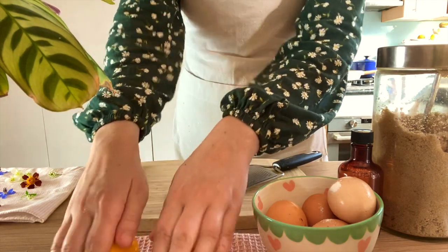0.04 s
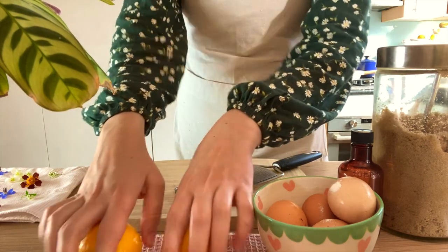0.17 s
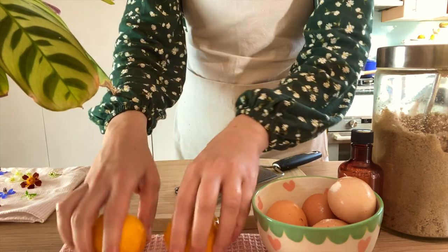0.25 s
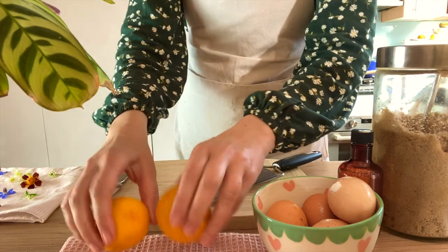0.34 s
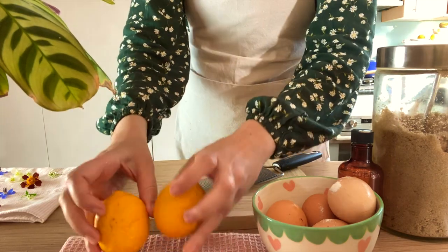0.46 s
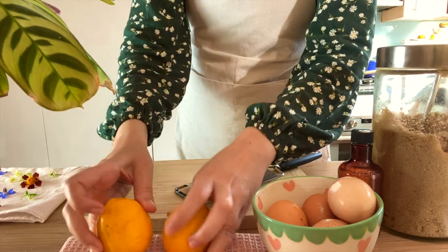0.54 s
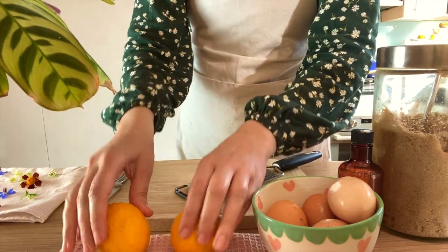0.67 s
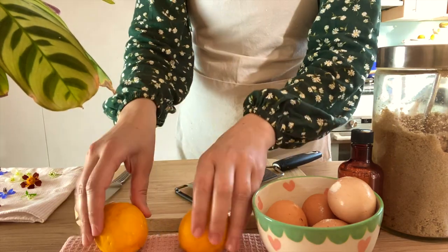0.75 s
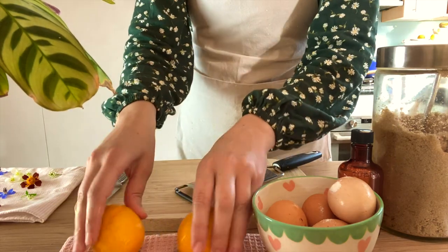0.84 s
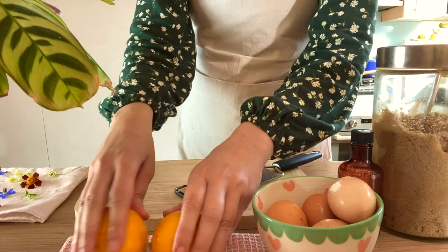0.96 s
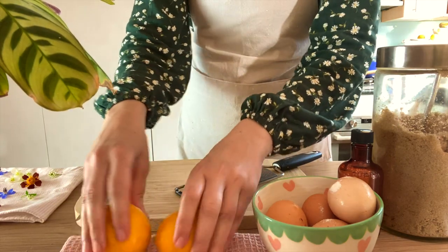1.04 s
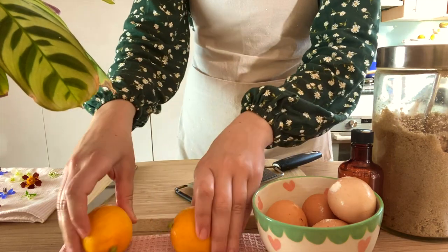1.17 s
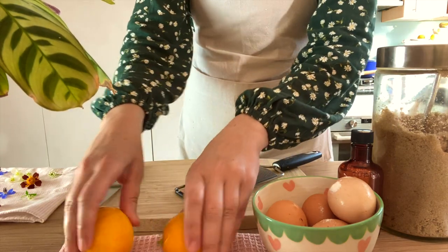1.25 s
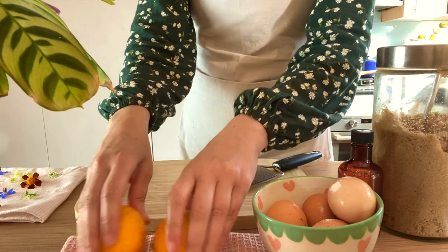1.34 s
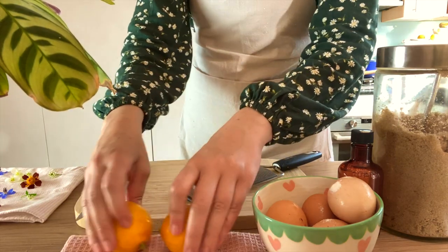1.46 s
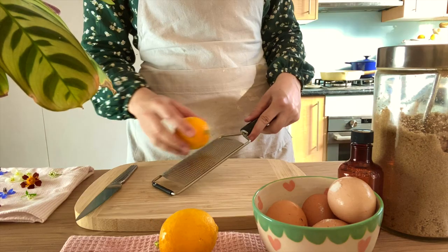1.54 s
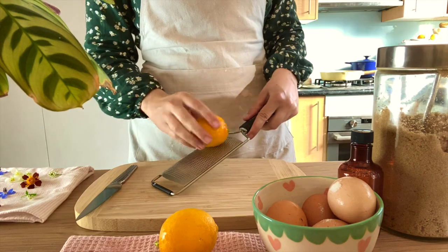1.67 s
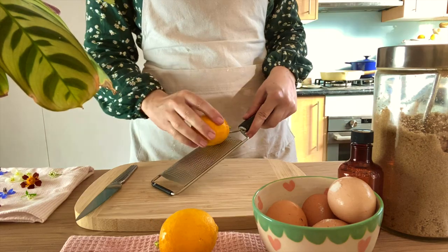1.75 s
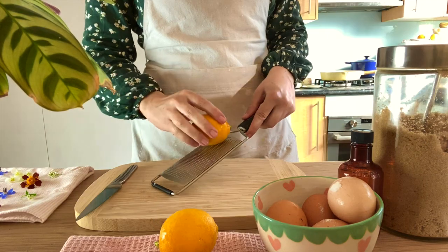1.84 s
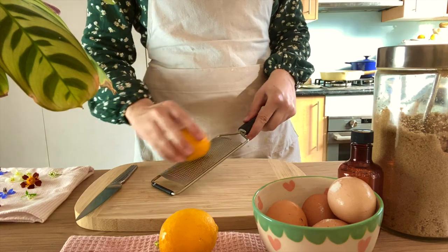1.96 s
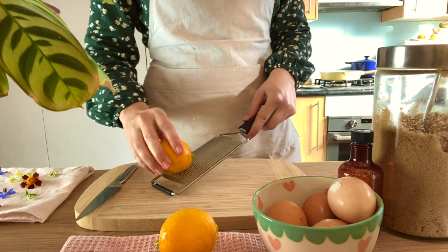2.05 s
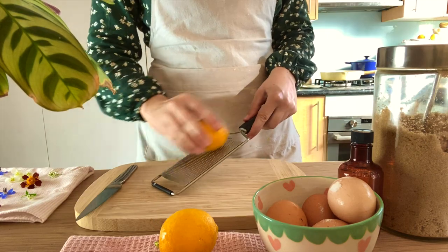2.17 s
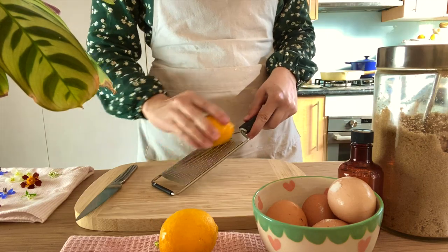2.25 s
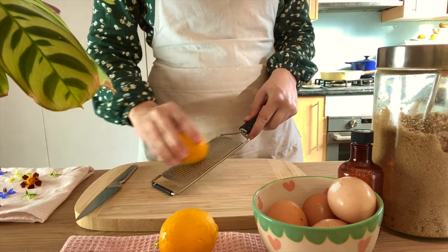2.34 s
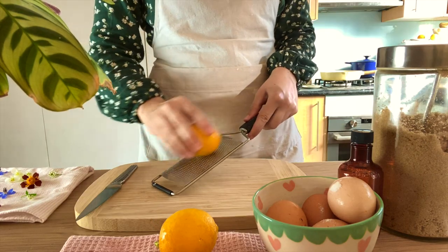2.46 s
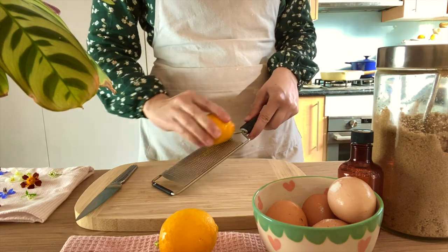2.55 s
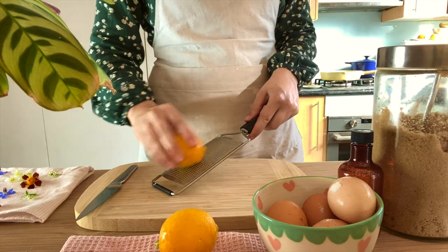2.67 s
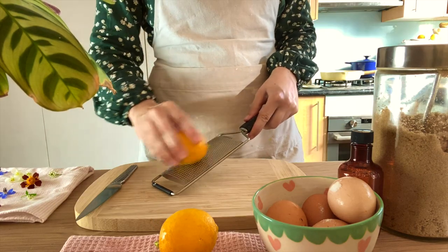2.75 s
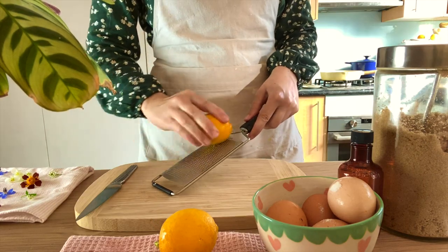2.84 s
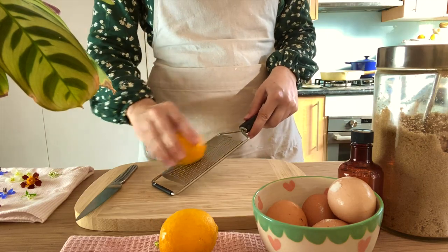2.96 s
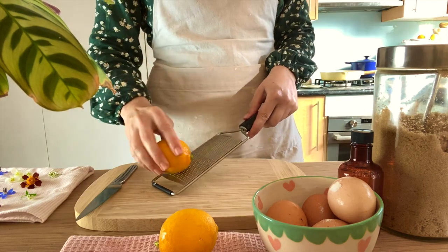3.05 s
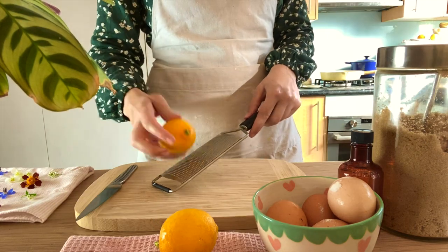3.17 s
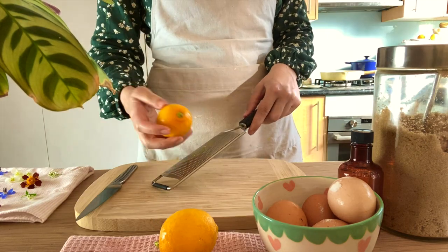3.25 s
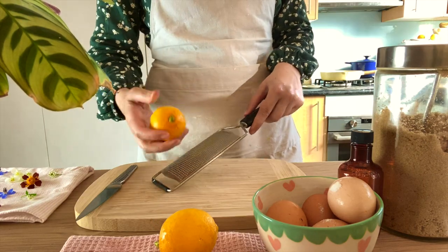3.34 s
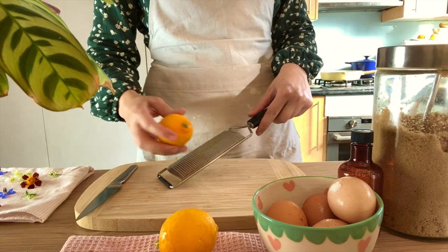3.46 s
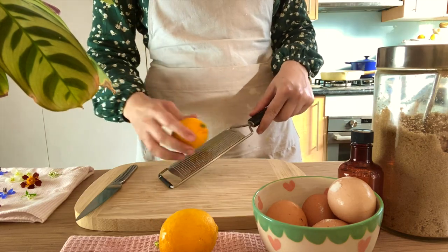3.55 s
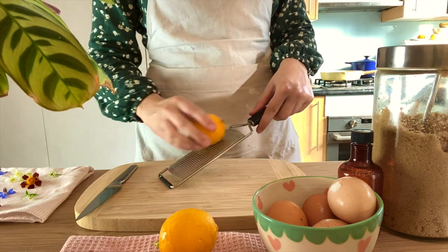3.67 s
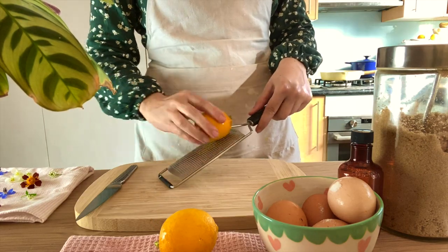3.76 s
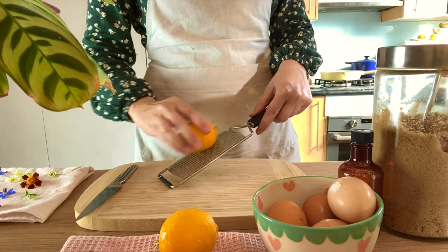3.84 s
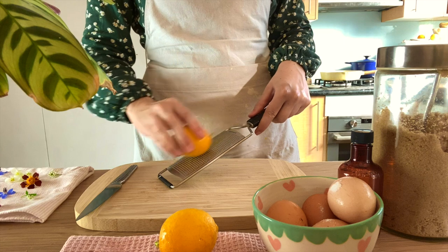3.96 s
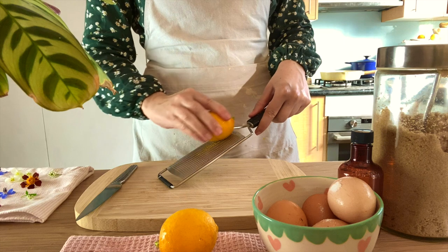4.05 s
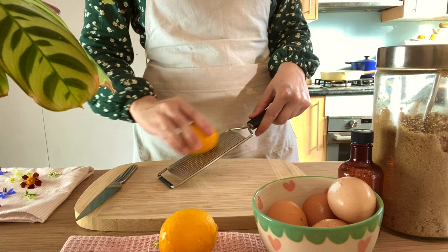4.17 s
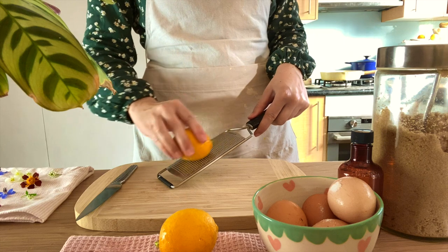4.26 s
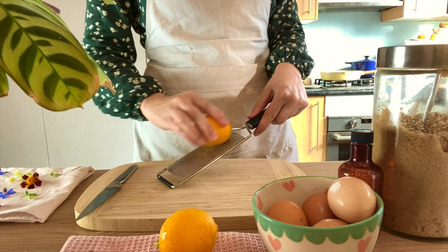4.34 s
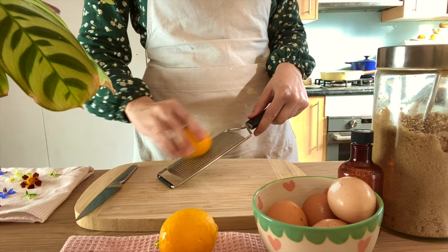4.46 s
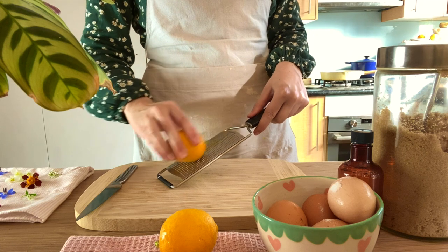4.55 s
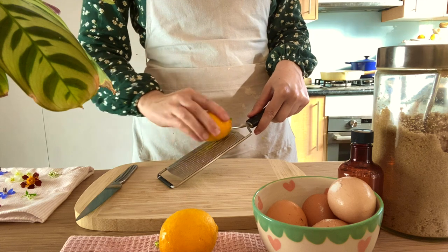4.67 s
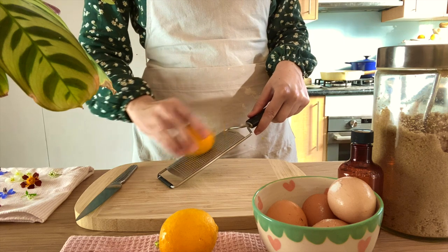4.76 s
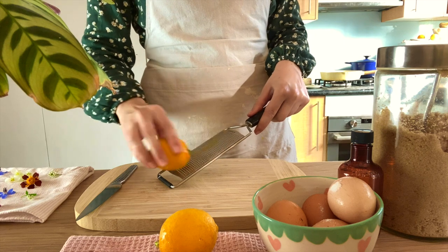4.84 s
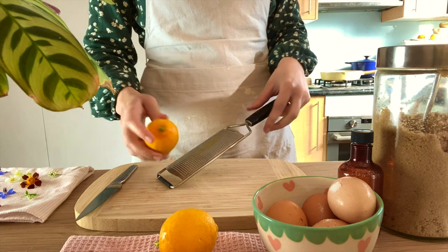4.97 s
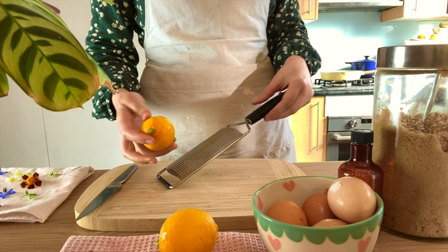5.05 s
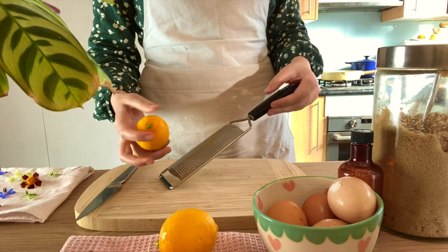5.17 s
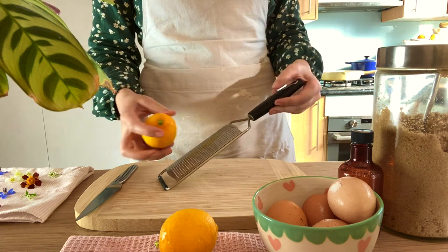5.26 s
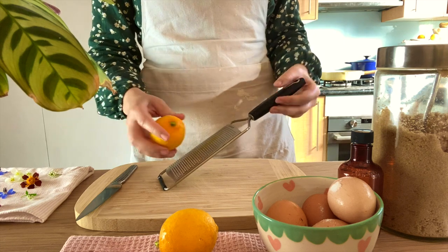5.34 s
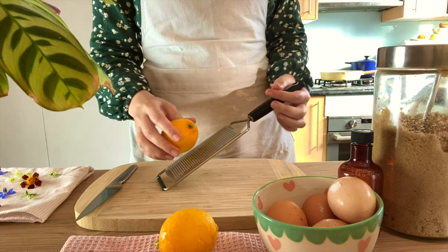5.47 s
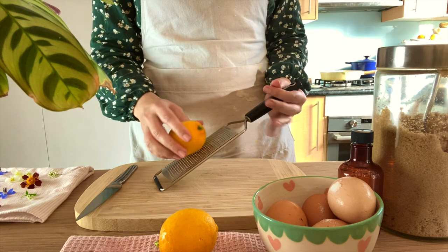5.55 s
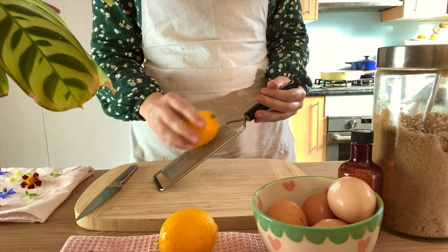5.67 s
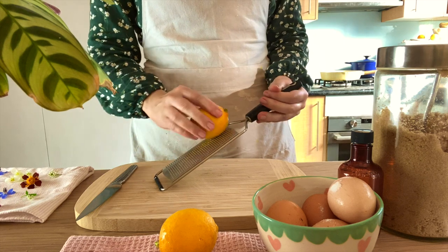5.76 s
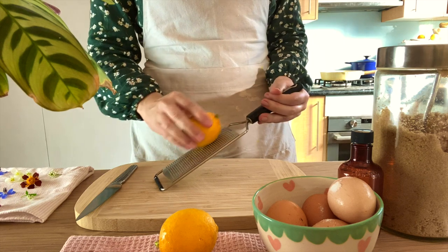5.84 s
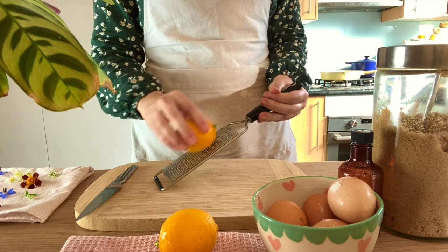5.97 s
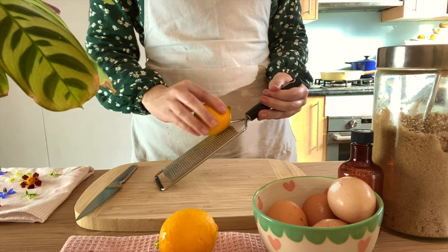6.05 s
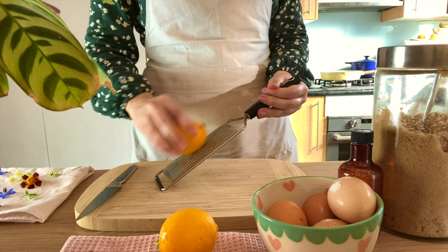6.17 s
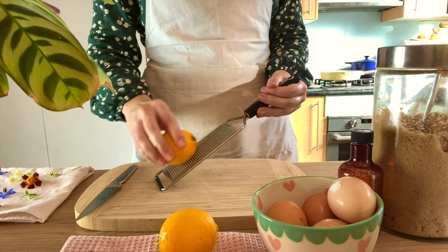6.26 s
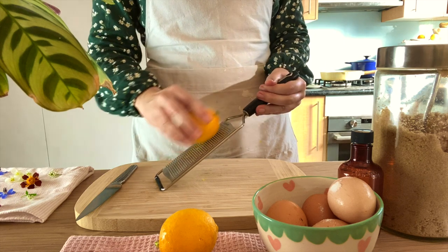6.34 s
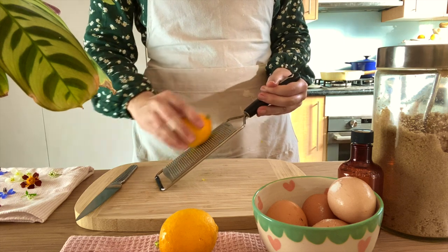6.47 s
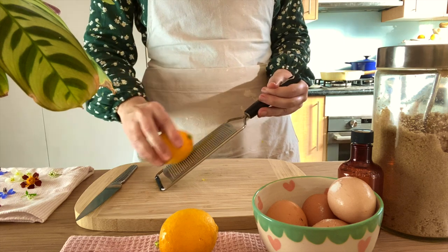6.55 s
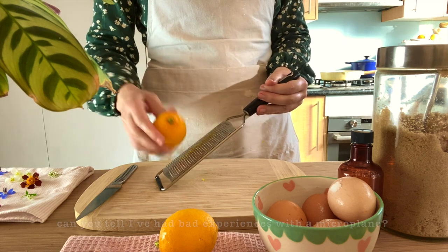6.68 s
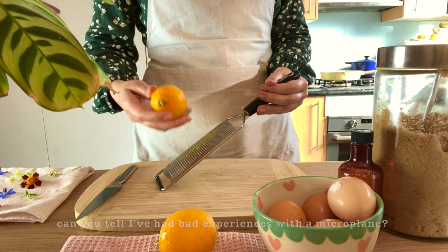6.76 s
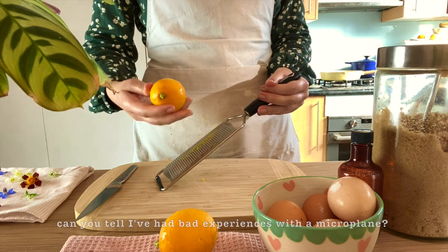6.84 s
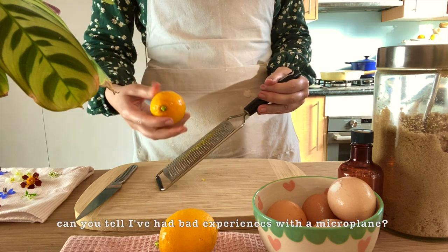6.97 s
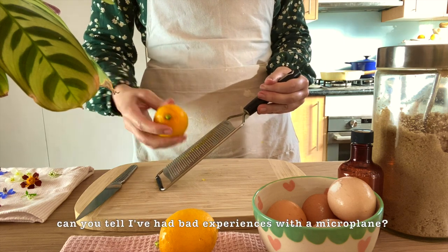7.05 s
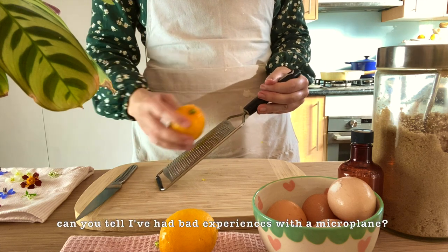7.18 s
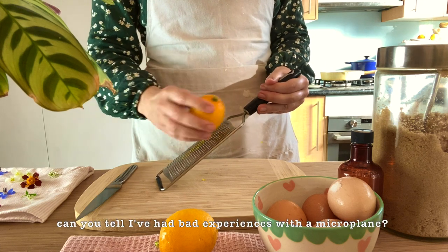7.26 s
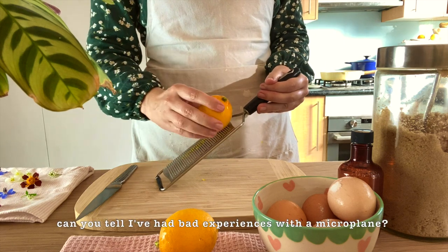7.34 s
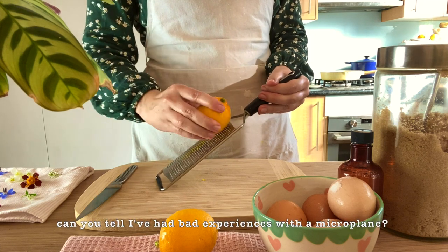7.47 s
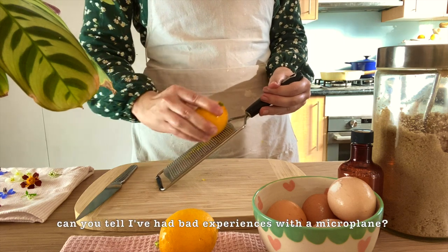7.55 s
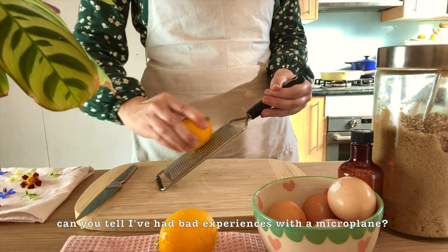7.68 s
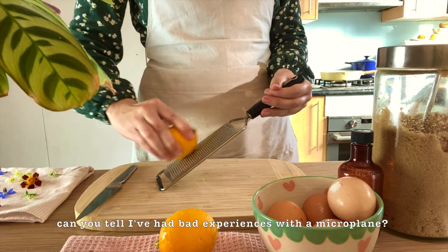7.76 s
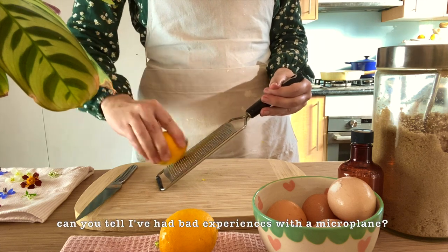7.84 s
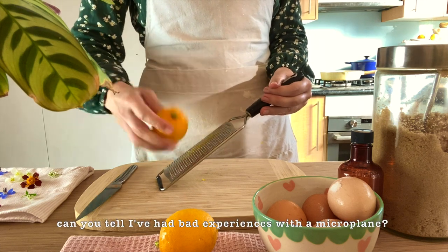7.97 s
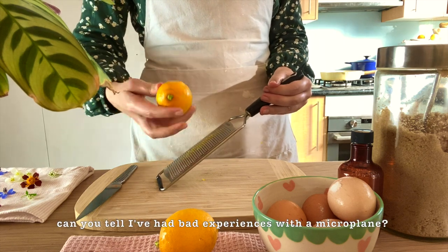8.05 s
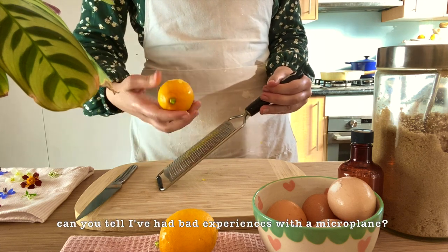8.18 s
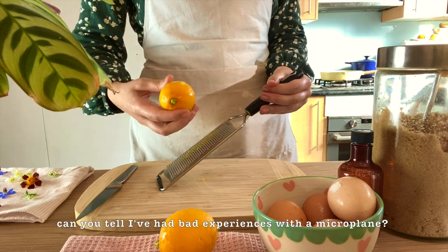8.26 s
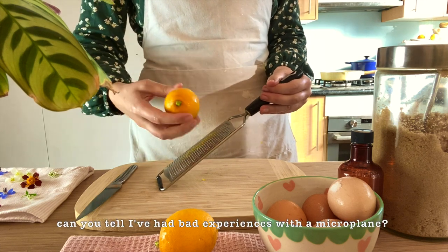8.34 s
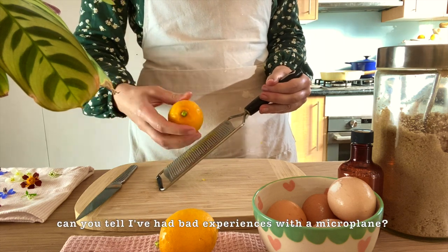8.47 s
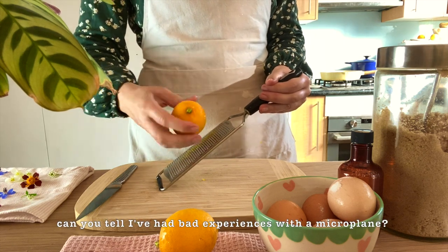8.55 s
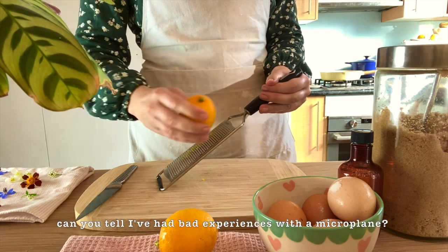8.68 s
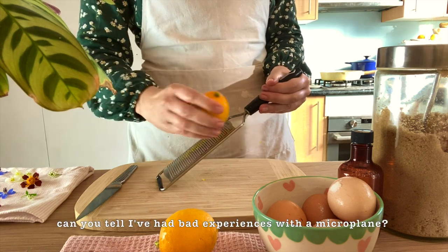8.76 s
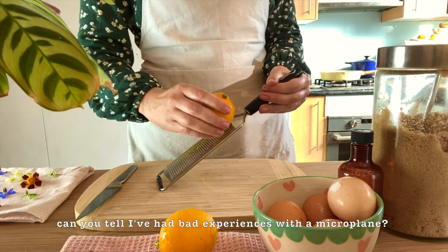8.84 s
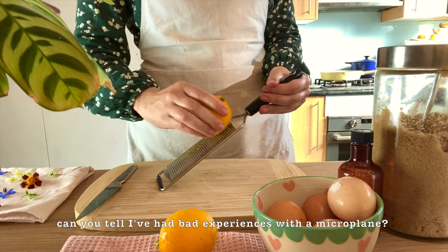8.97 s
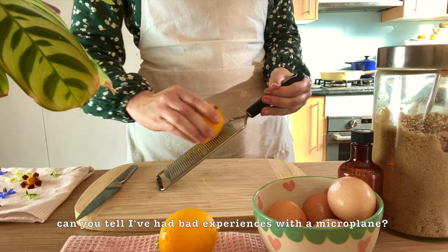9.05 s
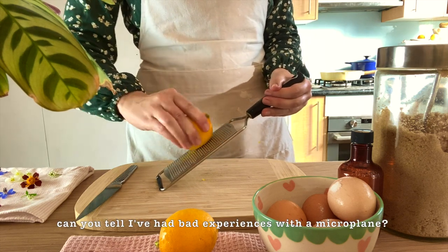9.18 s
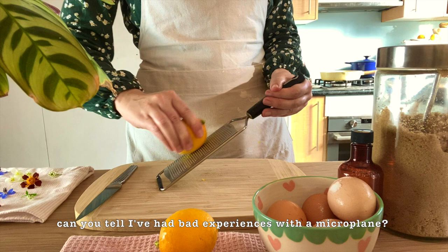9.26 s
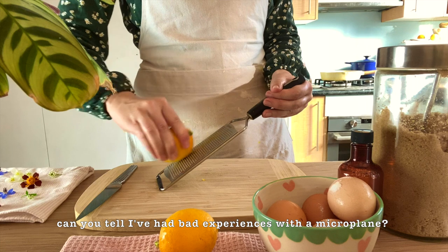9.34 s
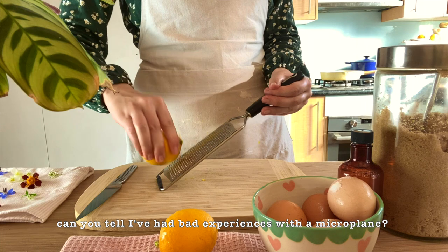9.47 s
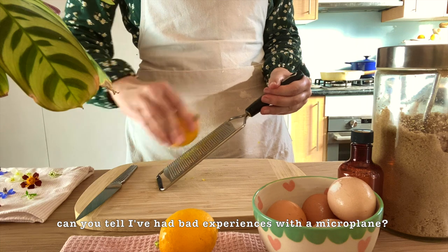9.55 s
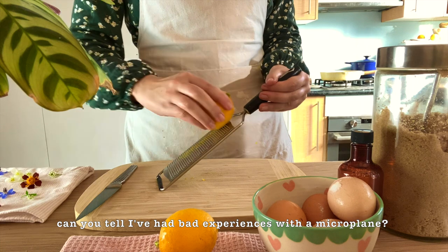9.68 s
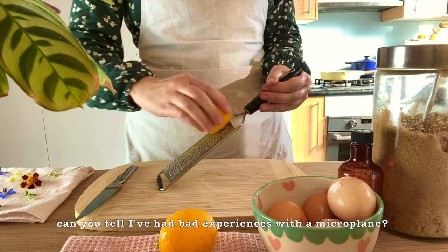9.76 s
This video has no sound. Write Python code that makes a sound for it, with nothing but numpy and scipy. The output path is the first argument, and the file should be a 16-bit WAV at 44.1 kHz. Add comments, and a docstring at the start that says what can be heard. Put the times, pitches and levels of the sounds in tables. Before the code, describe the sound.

Citrus zested on a long fine steel grater over a wooden board, three runs of quick raspy strokes, then slower juddering ones, in a small kitchen.

```python
"""A low hum and faint air in a small kitchen come first, then fingers rustle and a grater knocks on wood.
A lemon is zested on a long, fine steel grater whose tip rests on a wooden board: three runs of quick strokes,
bright going down and hollow coming back, then a few slow, juddering ones. Grains of noise for the teeth
tear the peel, ring the blade and drum the board. In between come more knocks, rubs and light touches.
The sound reaches two microphones directly and through a short room tail."""
import sys
import numpy as np
from scipy import signal
from scipy.fft import rfft, irfft, next_fast_len
from scipy.io import wavfile
from scipy.ndimage import map_coordinates

SR = 44100
rng = np.random.default_rng(int(sys.argv[2]) if len(sys.argv) > 2 else 0)


def to_wav(sig):
    """Store sig (one row per channel, or 1-D mono) as 16-bit WAV at the path in sys.argv[1].

    Samples outside -1..1 are clipped; the rate is SR.
    """
    pcm = np.clip(np.atleast_2d(sig), -1, 1) * 32767
    pcm = np.round(pcm).astype(np.int16)
    wavfile.write(sys.argv[1], SR, pcm.T)  # frames by channels


N = 432621
TIME = np.arange(N) / SR

# pushes down the blade, levels before the room: start_s, length_s, peak_at (moment of top speed,
# share of the length), blade_db, bite_db (bright bite), board_db (base level of board and chatter)
STROKES = [(1.901, 0.18, 0.6, -47, -45, -41), (2.256, 0.16, 0.47, -39.5, -41, -38),
           (2.576, 0.1646, 0.411, -40, -43, -37.5), (2.894, 0.1885, 0.17, -40, -47.5, -35.5),
           (3.791, .16, 0.49, -46.5, -53, -38.5), (4.108, .16, 0.34, -42.5, -49, -39),
           (4.405, 0.14, 0.407, -40, -46.5, -38), (4.701, 0.16, 0.31, -39, -47, -37),
           (5.814, 0.14, 0.4, -51, -60.5, -41), (6.101, 0.17, 0.4, -43, -56, -34.5),
           (6.405, .24, .45, -44.5, -62, -35.5), (7.496, 0.4, 0.74, -47.5, -75, -38),
           (9.001, 0.19, 0.51, -52, -59, -41.5), (9.179, .28, 0.48, -49, -64, -38.5),
           (9.732, 0.27, 0.24, -52.5, -62, -42)]
# ringing tones of the steel blade damped by the fruit: pitch_hz, width_hz, level_db (relative)
BLADE = [(764, 29, 1), (904, 143, 9), (1117, 92, 8.5), (1265, 90, -3), (1955, 330, 2.5), (2350, 370, 2),
         (2628, 266, 2), (3100, 220, 5), (3940, 300, -10)]
# ringing tones of the board with the grater leaning on it: pitch_hz, width_hz (before any extra damping),
# level_db (relative)
BOARD = [(123.7, 29, 1), (143.3, 15, -2.5), (192.1, 27, 8), (226.3, 38, 0.5), (259.2, 20, 5),
         (398, 26.3, 2), (490.4, 31, 0.5), (577, 66, -5.5), (707.8, 70, -6.5), (1025, 77, 2),
         (1550, 162, -4)]


def undb(db):
    """Turn decibels into a gain."""
    return 10 ** (np.asarray(db) / 20)


def unit(x):
    """Scale to an average strength (rms) of 1."""
    return x / np.sqrt(np.mean(x ** 2) + 1e-20)


def add(track, start, x):
    """Mix x into the track from a start time in seconds."""
    i = max(int(start * SR), 0)
    track[i:i + len(x)] += x[:max(len(track) - i, 0)]


def through(x, response):
    """Filter x by a response given as a function of frequency."""
    size = next_fast_len(x.shape[-1] + 8192)
    hz = np.maximum(np.fft.rfftfreq(size, 1 / SR), 1)
    return irfft(rfft(x, size) * response(hz), size)[..., :x.shape[-1]]


def colour(points):
    """Tone control whose curve runs through (Hz, dB) points."""
    at, db = np.transpose(points)
    return lambda hz: undb(np.interp(np.log(hz), np.log(at), db))


def modes(table, damping=1):
    """Response of a body with (Hz, width Hz, dB) resonances; damping widens them, so they die sooner."""
    def response(hz):
        return sum(undb(db) / (1 + 1j * (hz ** 2 - f ** 2) / (hz * width * damping))
                   for f, width, db in table)
    return response


def soften(x, hz, order):
    """Take away the treble above hz, as a soft contact does."""
    return signal.sosfilt(signal.butter(order, min(hz, .45 * SR), fs=SR, output="sos"), x)


def grains(count, rate, spread_db):
    """Random tiny impacts, rate of them a second on average; a wider spread makes a few much stronger."""
    hit = rng.random(count) < rate / SR
    size = undb(spread_db * np.minimum(rng.exponential(size=count), 4))
    return unit(hit * size * rng.choice([-1, 1], count))


def driven(force, envelope, response):
    """A body driven by a swelling force; its rms is about 1 where the envelope is 1."""
    return through(force * envelope, response) / np.std(through(force, response))


def wander(count, hz):
    """Slow random drift with an rms of 1, no faster than about hz."""
    settle = SR // 10  # drop the filter's start
    return unit(soften(rng.standard_normal(count + settle), hz, order=2)[settle:])


def bend(x, ratio):
    """Shift the pitch of a ring by a ratio that moves in time."""
    return map_coordinates(x, [np.cumsum(ratio)], order=3)


def swell(length):
    """A smooth rise and fall over a length in seconds."""
    return np.sin(np.linspace(0, np.pi, int(length * SR)))


def background(air_db=-72.0):
    """A low appliance hum with a wavering phase, over faint noise of the air that differs left and right."""
    # tone of the still kitchen: pitch_hz, level_db (relative, per Hz)
    air_tone = [(15, -42.5), (30, -21.5), (60, -4), (120, -15), (240, -21.5), (1240, -35), (4000, -41),
                (8500, -45.5), (15000, -55)]
    # appliance hum: pitch_hz, level_db (rms)
    hum_tones = [(48.4, -70), (96.9, -73.5)]
    mid, side = through(rng.standard_normal((2, N)), colour(air_tone))
    side = through(side, colour([(100, -0.61), (1000, 0.11)]))
    air = (mid + side * np.array([[1], [-1]])) / np.std(mid)  # air_db is the level of mid alone
    hum = np.zeros(N)
    for hz, db in hum_tones:
        phase = 2 * np.pi * hz * TIME + 0.46 * wander(N, 1.1)
        hum += undb(db) * np.sqrt(2) * np.sin(phase)
    return undb(air_db) * air + hum


def handling(rest_db=-82, shake_db=-56, shake_db_per_s=26.5, release_s=0.1154):
    """The table rumbles softly under the working hands, more with every push and change of grip."""
    # the hand changes its grip on the handle: start_s, length_s, level_db
    regrips = [(4.907, 0.68, -61.5), (5.506, 0.32, -53.5), (8.17, 0.106, -62.5)]
    table_tone = colour([(30, -33.0), (60, -5.5), (82, -11.5), (115, -6.0), (220, -17.5),
                         (600, -41.0), (2000, -67.0)])
    rumble = through(rng.standard_normal(N), table_tone)
    weight = np.full(N, undb(rest_db))
    for start, length, *_ in STROKES:
        # a long push shakes the table more, and the shaking outlasts it
        add(weight, start, undb(shake_db + shake_db_per_s * length) * swell(length + release_s))
    for start, length, db in regrips:
        add(weight, start, undb(db) * swell(length))
    return unit(rumble) * weight


def fingers(snap_s=0.00124, snap_hz=7000):
    """Skin and cloth slide in short grainy swishes; the peel snaps now and then in tiny noise bursts."""
    # fingers and sleeves sliding on fruit, handle and apron: start_s, length_s, level_db, centre_hz
    rubs = [(0.231, 0.1, -76, 3090), (0.541, 0.061, -76, 2750), (0.853, 0.09, -81, 3620),
            (1.349, 0.109, -76.5, 2200), (7.096, 0.077, -69, 1860), (7.169, 0.062, -70.5, 5000),
            (7.328, 0.0902, -61.5, 5780), (7.331, 0.056, -68, 1270), (8.195, 0.086, -68.5, 2394),
            (8.31, 0.09, -74.5, 2720), (8.475, 0.12, -73.5, 2200)]
    # small sharp snaps of the peel: start_s, peak_db
    peel_snaps = [(7.333, -49), (8.2, -65)]
    out = np.zeros(N)
    for start, length, db, hz in rubs:
        u = np.linspace(0, 1, int(length * SR))
        stroke = np.sin(np.pi * u ** 0.5)  # rises faster than it falls
        band = modes([(hz, hz * 1.3, 0)])
        swish = driven(grains(len(u), rate=900, spread_db=0.5), stroke, lambda f: band(f) ** 2)
        add(out, start, undb(db) * swish)
    t = np.arange(SR // 50) / SR
    for start, db in peel_snaps:
        burst = rng.standard_normal(len(t)) * np.exp(-t / snap_s)
        snap = through(burst, modes([(snap_hz, 6000, 0)]))
        add(out, start, undb(db) * snap / np.abs(snap).max())
    return out


def knocks(rattle_s=0.0083, rattle=0.068, thud_s=0.03695, thud=0.13, lag_s=0.00685):
    """Blows ring the wooden board's modes; a softer contact leaves out the upper ones."""
    # grater and fruit bumping the board: start_s, peak_db (before the room), contact_hz (brightness)
    bumps = [(0.551, -51.5, 123.4), (1.654, -57.5, 700), (3.355, -37.5, 765.4), (3.614, -49.5, 449.3),
             (3.682, -47, 477.5), (4.965, -35, 900), (4.9985, -31.5, 1320), (5.0626, -38, 1080),
             (5.128, -48.5, 300), (5.564, -43.5, 444), (7.33, -46, 492.7), (8.814, -39.5, 740),
             (9.685, -45, 712)]
    out, t = np.zeros(N), np.arange(SR // 4) / SR
    for start, db, contact_hz in bumps:
        chatter, rocking = rng.standard_normal((2, len(t)))
        # the tip chatters for an instant, and the board rocks on the table a little longer
        force = (t == 0) + rattle * chatter * np.exp(-t / rattle_s)
        force = force + thud * soften(rocking, 172, order=4) * np.exp(-t / thud_s)
        ring = through(soften(force, contact_hz, order=5), modes(BOARD, damping=3.3))
        # bending waves are slower at low pitch: the thump droops, lag_s late at 150 Hz
        blow = through(ring, lambda hz: np.exp(-4j * np.pi * lag_s * np.sqrt(150 * hz)))
        add(out, start, undb(db) * blow / np.abs(blow).max())
    return out


def zesting(snag_s=0.0169):
    """The hand goes to and fro; a snag is a very short jerk of the same kind."""
    # lighter drags back up the blade: start_s, length_s, peak_at (moment of top speed, share of the
    # length), blade_db, hollow_db (hollow note), hollow_hz (its base pitch)
    drags = [(2.076, 0.18, 0.5, -49.5, -49.5, 360), (2.41, 0.16, 0.52, -47, -44.5, 420),
             (2.733, 0.14, 0.5, -44, -44.5, 444), (3.975, 0.125, 0.48, -55, -48, 408),
             (4.281, 0.11, 0.44, -48, -48.5, 362), (4.553, .135, .58, -47, -48, 398),
             (5.977, 0.11, 0.49, -60, -51, 364.1), (6.312, 0.098, 0.244, -47.5, -46, 453)]
    # a row of teeth snagging the peel in mid-stroke: start_s, level_db
    snags = [(7.515, -62), (7.58, -58), (7.764, -50), (7.79, -47), (7.851, -50.5), (9.157, -45),
             (9.186, -53.5), (9.329, -45.5), (9.34, -49), (9.355, -44), (9.381, -48.5)]
    out = np.zeros(N)
    for start, *row in STROKES:
        add(out, start, push(*row, tearing_db(start)))
    for start, *row in drags:
        add(out, start, pull(*row, tearing_db(start)))
    for start, db in snags:
        add(out, start, undb(db) * rasp(*motion(snag_s, peak_at=0.55), tear_db=-3.5, board_db=10))
    return out


def tearing_db(start, worn_db=-3, fresh_db=3.5, wear_s=1):
    """Tearing against the blade: fresh, juicy peel is louder and wears off from the first stroke on."""
    return worn_db + fresh_db * np.exp(-(start - STROKES[0][0]) / wear_s)


def motion(length, peak_at):
    """Speed of the hand and the share of its way covered, both 0-1, with a rest afterwards."""
    t = np.arange(int(length * SR) + SR // 5) / SR
    peak_s = np.clip(peak_at, .1, .9) * length
    turn = np.interp(t, [0, peak_s, length], [0, np.pi / 2, np.pi])
    return np.abs(np.sin(turn)), (1 - np.cos(turn)) / 2


def push(length, peak_at, db, bite_db, board_db, tear_db, chatter_hz=208, chatter_db=-8.0, bite_hz=3230):
    """Down the blade: the teeth bite brightly, and the tip chatters on the board, most in a quick push."""
    speed, travel = motion(length, peak_at)
    count = len(speed)
    slow = np.interp(length, [.17, .3], [0, 1])  # 0 for a quick push, 1 for a slow one
    scrape = rasp(speed, travel, tear_db, board_db - db - 1.47 * (1 - slow), slow=slow)
    # bite and chatter both rise in pitch with speed and sag as the hand slows
    edge = modes([(bite_hz, 800, 0)])
    cut = driven(grains(count, rate=2000, spread_db=2.0), speed ** 2.0, lambda hz: edge(hz) ** 3)
    bite = bend(cut, 1 + .2 * (speed - .8) * (speed > 0))
    pitch = chatter_hz * (1 - 0.3023 * (1 - speed)) * (1 + 0.093 * wander(count, 60))
    cycles = np.cumsum(pitch) / SR
    chatter = np.sqrt(2) * np.sin(2 * np.pi * cycles) * speed * undb(2.5 * wander(count, 45))
    drumming = undb(board_db + chatter_db - 8.1 * slow) * chatter
    return undb(db) * scrape + undb(bite_db) * bite + drumming


def pull(length, peak_at, db, hollow_db, hollow_hz, tear_db, rise=.32, board_db=0.5):
    """Back up the blade: a dull scrape, with a hollow note that rises as the fruit travels."""
    # ringing tones of the free length of the blade: ratio (times the base pitch), width_hz, level_db
    free_blade = [(1.002, 59.5, 3), (1.7, 65, -2), (2.7, 90, -6)]
    speed, travel = motion(length, peak_at)
    ring = modes([(hollow_hz * ratio, width, gain_db) for ratio, width, gain_db in free_blade])
    bites = grains(len(speed), rate=3000, spread_db=2.5)
    hollow = driven(bites, speed ** 2.0, lambda hz: ring(hz) * np.abs(ring(hz)))
    note = bend(hollow, 1 + rise * (travel - .62))
    scrape = rasp(speed, travel, tear_db, hollow_db + board_db - db, back=0.98)
    return undb(db) * scrape + undb(hollow_db) * note


def rasp(speed, travel, tear_db, board_db, back=0, slow=0, judder_hz=40, glide=.07, lift_db=7):
    """Peel passing over the teeth; the speed of the hand drives tearing, blade and board."""
    # tone of tearing peel: pitch_hz, level_db (relative)
    tear_tone = [(400, -14.5), (1000, 0.5), (1600, 5), (3100, 3.5), (5500, -4), (6900, -1), (8400, -5.5),
                 (15000, -5.5)]
    count = len(speed)
    # a slow stroke catches unevenly on one row of teeth after another; a fast one glides
    rows = np.cumsum(judder_hz * (1 + 0.197 * wander(count, 19.7))) / SR
    jerk = 2 * np.cos(np.pi * rows) ** 4 + .6 * wander(count, 160)
    catch = unit(undb((1.0 + 1.5 * slow) * jerk))
    # in slow strokes fewer teeth bite each second
    pace = undb(-9 * slow)
    bites = grains(count, rate=1700 * pace, spread_db=2.0) * unit(catch)
    shreds = grains(count, rate=4500 * np.sqrt(pace), spread_db=0.0) * catch
    tearing = driven(shreds, speed ** 1.48, colour(tear_tone))
    # the way back and slow strokes are duller
    steel = colour([(200, -12.0), (520, 2.5), (800, 3.9 + back), (1250, 2 + 2 * back - 2 * slow),
                    (1650, -1 - 5 * back - slow), (3250, -3 - 3 * back), (4200, -10.5), (12000, -21.5)])
    # the ring changes colour and drifts in pitch as the fruit travels along the blade
    first, last = (driven(bites, speed ** 1.91, lambda hz: touched()(hz) * steel(hz)) for _ in range(2))
    ring = (1 - travel) * first + travel * last
    blade = bend(ring, 1 + glide * (3 * back - 1) * (travel - .5))  # falls going down, rises coming back
    blade = reflected(blade, np.abs(back - travel))
    # on the way back and in slow strokes the tip presses less, so the board's deep modes weaken
    pressure = colour([(195, -lift_db * back - 2 * slow), (280, -4.5), (400, 3 * slow - 4 * back),
                       (600, -13.5), (1000, -25.0)])
    wood = modes(BOARD)
    board = driven(bites, speed ** 0.92, lambda hz: wood(hz) * pressure(hz) / (1 + (100 / hz) ** 8))
    return blade + undb(tear_db) * tearing + undb(board_db) * board


def touched(spread_db=3):
    """Response of the blade at one random point of contact, which favours some modes over others."""
    return modes([(hz, width, db + spread_db * rng.standard_normal()) for hz, width, db in BLADE])


def reflected(x, travel, near_s=0.0009, far_s=0.00159, share=0.39):
    """Waves return from the end of the blade; the notches they cut slide as the fruit travels."""
    delay_s = near_s + (far_s - near_s) * travel
    # each stroke also scales its delay at random
    late = np.arange(len(x)) - SR * delay_s * np.exp(0.16 * rng.standard_normal())
    return (x - share * map_coordinates(x, [late], order=3)) / np.hypot(1, share)


def touches():
    """Fruit shifting lightly on the teeth: sparse ticks ring the blade and murmur in the board."""
    # fruit set lightly on the teeth: start_s, length_s, blade_db, board_db
    light_touches = [(3.291, 0.12, -78, -62.5), (3.63, 0.14, -77.5, -60.5), (5.609, 0.16, -81.5, -57),
                     (8.849, 0.17, -75.5, -59), (8.972, .06, -63.5, -54)]
    out = np.zeros(N)
    for start, length, blade_db, board_db in light_touches:
        speed, _ = motion(length, peak_at=0.44)
        ticks = grains(len(speed), rate=860, spread_db=1)
        add(out, start, undb(blade_db) * driven(ticks, speed, modes(BLADE)))
        add(out, start, undb(board_db) * driven(soften(ticks, 406, order=4), speed, modes(BOARD)))
    return out


def kitchen(x, t60_low=0.29, t60_high=0.27, wet_db=-3):
    """Direct sound reaches the microphones out of step; the walls add a short, diffuse tail."""
    # how far the left microphone runs ahead of the right: pitch_hz, phase_radians
    left_lead = [(340, -0.25), (900, -1.78), (1150, 1.35), (3500, -1.7), (4300, -1.5), (5500, -2),
                 (8400, -0.49), (15400, 10.5)]
    t = np.arange(SR // 2) / SR
    decay = -np.log(1000) * t  # divided by t60, the seconds to fall by 60 dB
    noise = rng.standard_normal((2, len(t))) * (t > .003)
    low = soften(noise, 2170, order=2)
    high = through(noise, colour([(1500, -39.0), (4500, 1.5), (15000, -5.5)]))
    tail = low * np.exp(decay / t60_low) + high * np.exp(decay / t60_high)
    # hard worktops and tiles keep a band of the upper middle ringing longest
    tail += undb(-10.0) * through(noise, modes([(2200, 770, 0.015)])) * np.exp(decay / 0.38)
    tail = tail / np.sqrt(np.sum(tail[0] ** 2))
    tail = through(tail, colour([(120, -14.0), (330, -4.5), (650, -7.0), (2300, 1.0),
                                 (5000, -6.0), (12000, -12)]))
    wet = signal.fftconvolve(x[None], tail, axes=1)[:, :N]
    at_hz, lead = np.transpose(left_lead)
    # each side takes half of the lead, with opposite signs
    direct = np.array([through(x, lambda hz: np.exp(side * .5j * np.interp(hz, at_hz, lead)))
                       for side in (1, -1)])
    return direct + undb(wet_db) * wet


def scene():
    """Grater, hands and room together; the bass leans left and the tones near 1100 Hz lean right."""
    # left level minus right level: pitch_hz, difference_db
    balance = [(100, 1), (380, 3.5), (1120, -3), (2200, 0)]
    sources = background(), handling(), fingers(), knocks(), zesting(), touches()
    sound = kitchen(sum(sources[1:])) + sources[0]  # the background bypasses the room
    lean = colour(balance)
    return np.array([through(x, lambda hz: lean(hz) ** (side / 2)) for x, side in zip(sound, (1, -1))])


def record(dry):
    """Cut the treble off steeply above 15400 Hz."""
    return signal.sosfilt(signal.ellip(8, .2, 70, 15400, fs=SR, output="sos"), dry)


dry = scene()
out = record(dry)
to_wav(out)
```